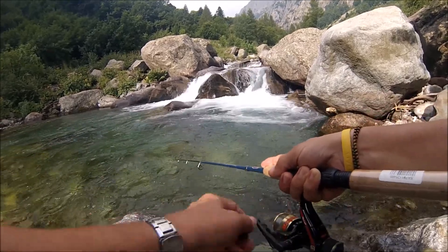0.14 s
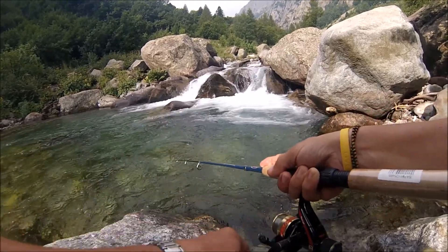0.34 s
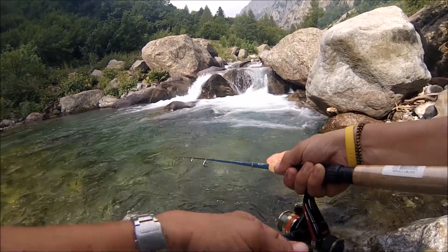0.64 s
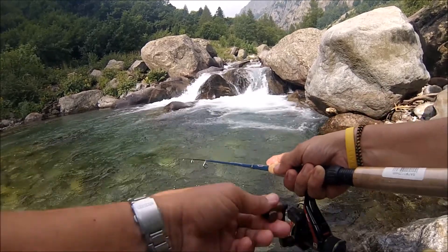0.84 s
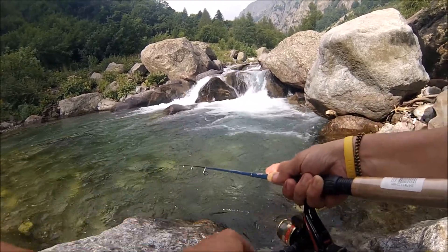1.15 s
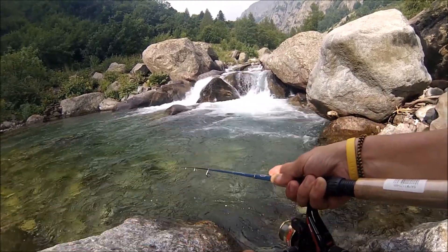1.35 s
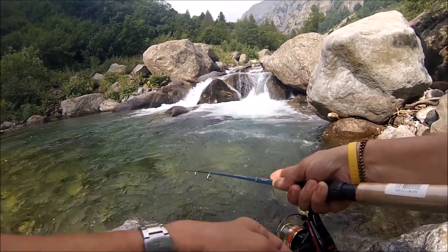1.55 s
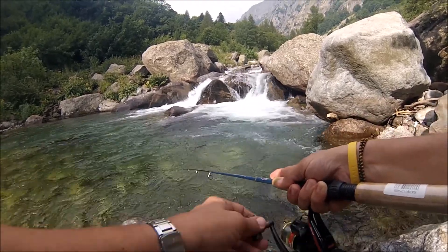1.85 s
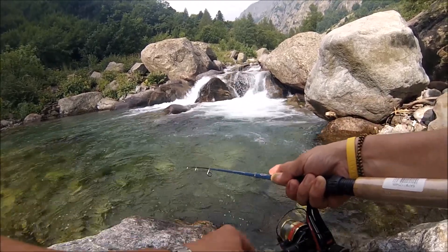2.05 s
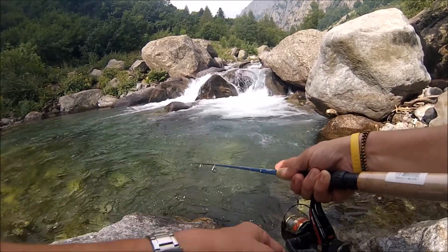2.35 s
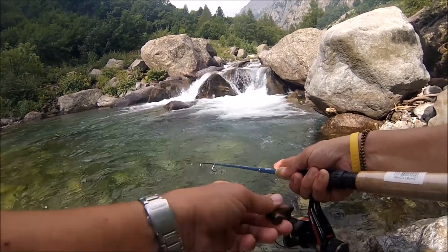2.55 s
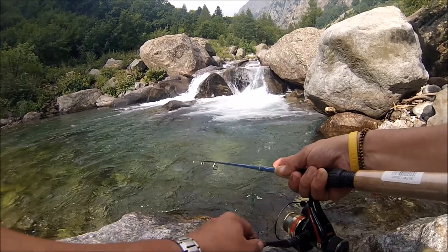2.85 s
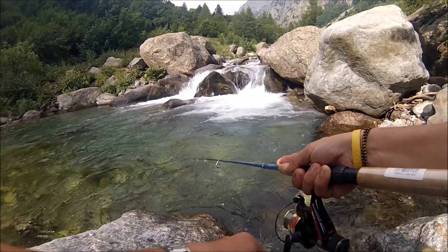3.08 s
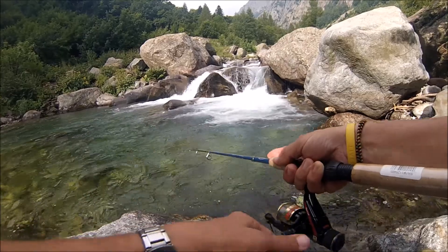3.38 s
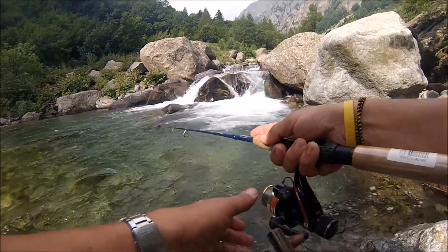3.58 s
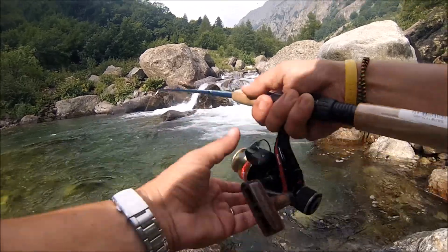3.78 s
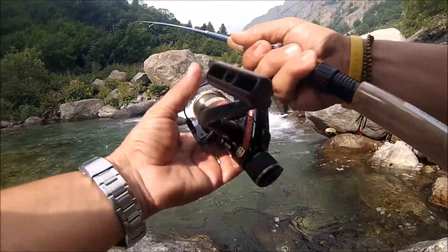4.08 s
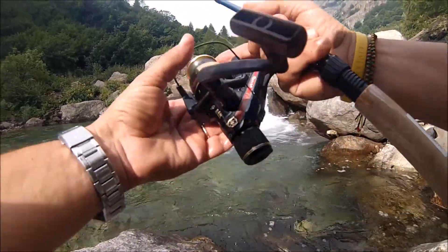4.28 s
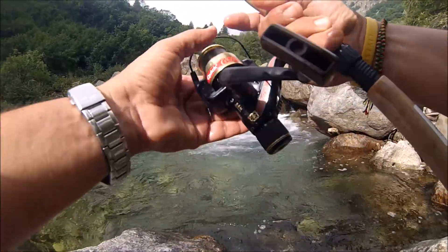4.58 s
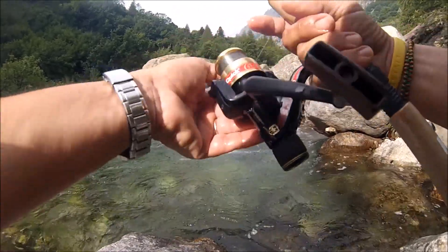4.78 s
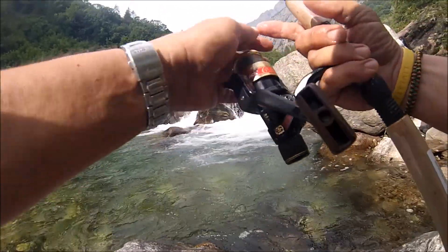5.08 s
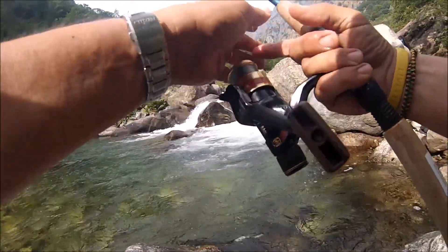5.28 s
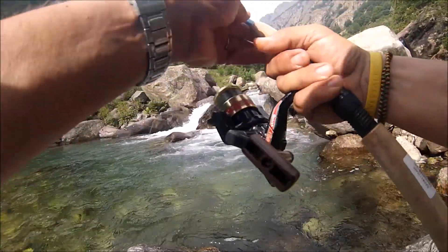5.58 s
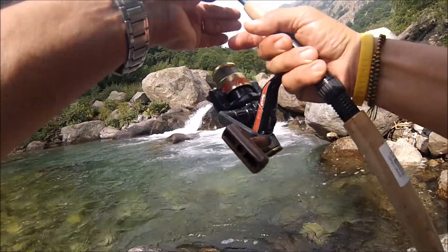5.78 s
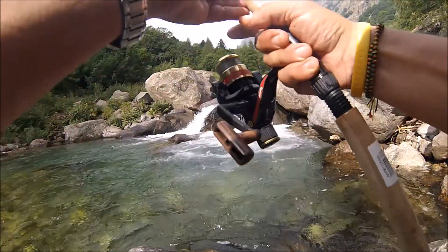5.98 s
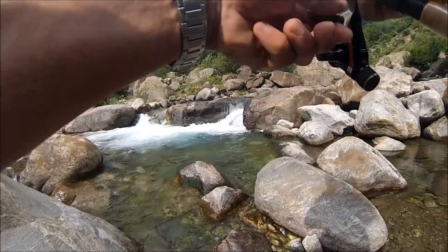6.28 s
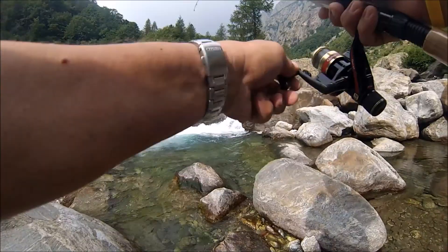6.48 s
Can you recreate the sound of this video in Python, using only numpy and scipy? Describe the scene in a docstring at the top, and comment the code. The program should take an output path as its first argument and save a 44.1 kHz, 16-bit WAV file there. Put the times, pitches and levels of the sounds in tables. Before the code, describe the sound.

A small waterfall rushes into a rocky mountain pool throughout, a dense, steady, lightly flickering noise with bubbling detail, coloured boxy and resonant by the closed case of a body-worn camera. From 0 to about 3.4 seconds a fishing reel is wound close by: fine, bright metallic ratchet ticks at roughly thirty to forty-five per second, almost a purr, speeding and easing with the hand and slowing towards the end. Two faint separate clicks follow near 3.8 and 3.9 seconds as the reel is handled. Then only water remains, its spray slightly duller. At about 6.3 seconds the angler turns aside; the rush abruptly changes tone, more hollow and less crisp, and a softer, fast ticking resumes until the end at about 6.6. Beneath everything, very low, soft paired heartbeat thumps recur about every half second, varying in strength. Nearly mono, without echo.

```python
"""A small waterfall rushes into a mountain pool: shaped noise with bubbles, its bands flickering apart,
heard by a body-worn camera in a closed, ringing case. An angler winds a reel whose pawl ticks over its
ratchet, each tick a burst of damped modes; he stops, then turns aside and winds again.
His pulse knocks softly through the camera mount as pairs of brief low swings."""
import sys
import numpy as np
from scipy import signal
from scipy.fft import rfft, irfft, next_fast_len
from scipy.io import wavfile
from scipy.ndimage import uniform_filter1d

SR = 44100
rng = np.random.default_rng(int(sys.argv[2]) if len(sys.argv) > 2 else 0)


def dump(signal):
    """Clip the signal to [-1, 1] and save it as 16-bit WAV at the path in sys.argv[1]."""
    limited = np.clip(np.atleast_2d(signal).T, -1, 1)
    pcm = np.round(limited * 32767).astype(np.int16)
    wavfile.write(sys.argv[1], SR, pcm)


N = 292369
TIME = np.arange(N) / SR  # s
SIZE = next_fast_len(N + 8192)  # transform length, padded so that filter tails do not wrap
FREQ = np.maximum(np.arange(SIZE // 2 + 1) * SR / SIZE, 1)  # Hz

# spectrum of the falling water: (frequency [Hz], relative density [dB])
RUSH_SPECTRUM = [(20, 4.5), (60, -1.5), (180, -4), (300, -1.5), (420, -4), (660, -14), (950, -14),
                 (1300, -7.5), (2400, -9.5), (2850, -20.5), (4400, -21.5), (7000, -22.5), (9500, -29.5),
                 (15000, -37)]
# air and wall resonances of the case, heard in the water:
# (frequency [Hz], full width at half the lift [Hz], lift [dB])
CASE_RESONANCES = [(1501, 220, 7), (1736, 224, -4), (1984, 125, 5.5), (2279, 235, 9), (3100, 88, 7),
                   (3477, 330, 7), (3870, 140, 6), (5400, 520, 2.5), (12300, 3600, 3)]
# change in the rush when the angler faces fully away: (frequency [Hz], change [dB])
ASIDE_CHANGE = [(100, 1.5), (270, -6), (500, -0.5), (800, 7.5), (1150, -1), (1500, -2), (2000, -8),
                (2500, -3.5), (3400, -3.5), (6000, -4), (14000, -2)]
# how far the angler has turned: (time [s], share turned aside [0-1])
TURN_SHARE = [(0, 0.1), (6.24, 0.05), (6.34, 0.9), (6.63, 0.76)]
RUSH_DB = -47.5  # steady fall, before flicker and turning
SPRAY_DB = 0.06  # lift of the bands above 3 kHz
# raised arms shade the spray from the microphone
ARMS_UP_S, ARMS_RISE_S, ARMS_SHADE_DB = 3.2, 0.71, -1.45

# faint hiss that differs between the sides: (frequency [Hz], relative density [dB])
SIDE_HISS_SPECTRUM = [(100, -9), (3000, -20), (4800, -11), (6000, -14.5), (8500, 8.5), (11000, 6.5),
                      (15000, -11.5)]
SIDE_HISS_DB = -83

# heartbeats: (time [s], relative strength [dB])
HEARTBEATS = [(-0.04, -6), (0.487, -4), (1.026, 0.5), (1.555, 3), (2.09, -1), (2.623, -4.5), (3.152, -4),
              (3.682, 2.5), (4.21, 4.5), (4.741, 1), (5.275, -2.5), (5.808, 4), (6.365, 3.5)]
# the quick first swing takes only a share of a beat's strength in dB
KNOCK_HZ, KNOCK_DB, KNOCK_SHARE = 35, -40, 0.6
# the slow second swing is brisker on strong beats
HEAVE_LAG_S, HEAVE_HZ, HEAVE_HZ_PER_DB, HEAVE_DB = 0.0794, 18.9, 0.5, -38.5

# pace of the hand with the rod low, before crank surges: (time [s], rate [ratchet teeth/s])
WINDING_LOW = [(0, 46.06), (0.39, 33.74), (0.56, 41.61), (1.17, 32.88), (1.39, 41.79), (1.67, 32.24),
               (2.44, 43.05), (2.99, 26.46), (3.4, 22.12)]
# pace of the hand with the rod raised: (time [s], rate [ratchet teeth/s])
WINDING_RAISED = [(6.27, 46.31), (6.4, 44.64), (6.5, 50.93), (6.63, 41.62)]
# modes of the reel, each the square of one resonance:
# (frequency [Hz], width before squaring [Hz], relative level held low [dB], held raised [dB])
REEL_MODES = [(3500, 440, -2.5, -8), (4420, 310, -2, -9), (5470, 300, 0.5, -3), (5810, 770, -2, -12),
              (6810, 370, 1, -4.5), (7900, 620, -10, -3), (8570, 400, -19, -14), (8750, 380, -7.5, -11),
              (10000, 340, -11, -13), (11020, 820, -10.5, -16), (12250, 800, -12.5, -14),
              (14500, 2000, -19, -19)]
# single clicks as the reel is taken in hand: (time [s], level [dB])
HANDLING_CLICKS = [(3.842, -62), (3.922, -61.5)]
# interval between crank strokes, moment of one stroke, peak rise in rate
STROKE_S, STROKE_AT_S, SURGE_TEETH_PER_S = 0.479, 0.359, 2.62
# tick level at the median rate, and its growth with speed
TICK_LOW_DB, TICK_RAISED_DB, TICK_DB_PER_DOUBLING = -60.1, -64, 2.5
TOOTH_SCATTER_DB = 2.3  # how much each tooth differs in the modes that it favours

TOP_HZ = 15250  # upper edge of the camera's passband


def undb(db):
    """Decibel law: amplitude gain is ten to the power of dB / 20."""
    return 10 ** (np.asarray(db) / 20)


def level(x, db):
    """Normalization: scale a signal to a given rms level in dB."""
    return x * undb(db) / np.sqrt(np.mean(x ** 2))


def shape(x, gain):
    """Linear filtering: multiply the spectrum by a gain for each frequency."""
    return irfft(rfft(x, SIZE) * gain, SIZE)[:N]


def colour(points, hz):
    """Spectral envelope: join (frequency [Hz], level [dB]) points along a log-frequency axis."""
    point_hz, point_db = np.transpose(points)
    return np.interp(np.log(hz), np.log(point_hz), point_db)


def resonance(hz, width_hz, freq=FREQ):
    """Damped oscillator: band-pass response of one mode, with gain 1 at its centre."""
    damping = 1j * freq * width_hz
    return damping / (hz ** 2 - freq ** 2 + damping)


def walk(rate):
    """Slow random fluctuation: levels held for 1 / rate s, then smoothed twice; spread near 1."""
    hold = int(SR / rate)
    held = np.repeat(rng.standard_normal(N // hold + 1), hold)
    smooth = uniform_filter1d(uniform_filter1d(held, hold), hold)
    return np.sqrt(2) * smooth[:N]


def bubbles(count, spread_db, cycles):
    """Bubble resonance: air pockets ring briefly and rise in pitch as they near the surface."""
    out = np.zeros(N + SR)
    for when, pitch, size in rng.random((count, 3)):
        hz = 200 * 16 ** pitch  # four octaves up from 200 Hz
        age = np.arange(int(min(cycles / hz, 0.5) * SR))  # samples
        fade = age / len(age)
        phase = 2 * np.pi * hz * age / SR * (1 + fade / 10)
        ring = np.sin(phase) * np.exp(-np.log(100) * fade)  # decays by 40 dB
        # many small pockets and a few strong ones
        strength_db = -spread_db * np.log(max(1 - size, 1 / count))
        start = int(when * N)
        out[start:start + len(age)] += undb(strength_db) * ring
    return out[:N]


def waterfall():
    """Superposition: countless bursts merge into noise with bubbles; each band flickers on its own."""
    turned = np.interp(TIME, *np.transpose(TURN_SHARE))
    arms_up = np.clip((TIME - ARMS_UP_S) / ARMS_RISE_S, 0, 1)
    spray_db = SPRAY_DB + ARMS_SHADE_DB * arms_up * (1 - turned)

    bursts = level(rng.standard_normal(N), 0)
    nearer = level(bubbles(count=2500, spread_db=2.0, cycles=18.5), -18.5)
    case_db = sum(db * 0.5 ** ((2 * (FREQ - hz) / width) ** 2) for hz, width, db in CASE_RESONANCES)
    rush = shape(bursts + nearer, undb(colour(RUSH_SPECTRUM, FREQ) + case_db))
    spectrum = rfft(level(rush, RUSH_DB), SIZE)

    out = np.zeros(N)
    for hz in 2 ** np.arange(4, 14.6, 0.5):
        # overlapping triangles, half an octave apart
        window = np.maximum(1 - 2 * np.abs(np.log2(FREQ / hz)), 0)
        band = irfft(spectrum * window, SIZE)[:N]
        lift_db = spray_db if hz > 3000 else 0
        flicker_db = 0.58 * walk(14)
        out += band * undb(lift_db + turned * colour(ASIDE_CHANGE, hz) + flicker_db)
    return out


def side_hiss():
    """Stereo difference: independent shaped noise, to be added to one side and taken from the other."""
    hiss = shape(rng.standard_normal(N), undb(colour(SIDE_HISS_SPECTRUM, FREQ)))
    return level(hiss, SIDE_HISS_DB)


def pulse(rise_cycles, fall_cycles, rub_db):
    """Impulsive excitation: each beat rocks the camera, a quick knock and a slow heave; the strap rubs."""
    out = np.zeros(N)
    # dull strap noise, level relative to the swing that carries it
    rub = level(shape(rng.standard_normal(N), resonance(64, 60) ** 2), rub_db)
    for beat, strength_db in HEARTBEATS:
        knock = beat, KNOCK_HZ, KNOCK_DB + KNOCK_SHARE * strength_db
        heave_hz = HEAVE_HZ + HEAVE_HZ_PER_DB * strength_db
        heave = beat + HEAVE_LAG_S, heave_hz, HEAVE_DB + strength_db
        for when, hz, db in (knock, heave):
            near = np.abs(TIME - when) < 2 / hz
            turns = (TIME[near] - when) * hz  # cycles from the middle of the swing
            width = np.where(turns < 0, rise_cycles, fall_cycles)
            envelope = np.exp(-(turns / width) ** 2)
            out[near] += undb(db) * envelope * (rub[near] - np.sin(2 * np.pi * turns))
    return out


def teeth(pace, surge, tick_db):
    """Ratchet kinematics: the pawl drops at each whole tooth of travel; faster teeth tick louder.

    Gives rows (time [s], level [dB]); the crank surges by a cosine on each push and pull."""
    rate = np.interp(TIME, *np.transpose(pace), left=0, right=0)
    stroke = np.cos(2 * np.pi * (TIME - STROKE_AT_S) / STROKE_S)
    rate = rate + (rate > 0) * surge * stroke
    teeth_passed = np.floor(np.cumsum(rate) / SR)
    drops = np.flatnonzero(np.diff(teeth_passed))
    doublings = np.log2(rate[drops] / np.median(rate[drops]))
    return np.column_stack([TIME[drops], tick_db + TICK_DB_PER_DOUBLING * doublings])


def pawl(ticks, modes, rise_s, fall_s):
    """Modal excitation: the pawl scrapes a tooth's edge, snaps down and chatters, ringing the reel."""
    out = np.zeros(N + SR)
    age = np.arange(-256, 512) / SR  # s from the snap
    force = np.exp(-np.where(age < 0, (age / rise_s) ** 2, age / fall_s))
    freq = np.fft.rfftfreq(len(age), 1 / SR)
    rings = np.array([undb(db) * resonance(hz, width, freq) ** 2 for hz, width, db in modes])
    for when, db in ticks:
        scrape = rfft(force * rng.standard_normal(len(age)))
        # each tooth favours the modes a little differently
        ring = undb(TOOTH_SCATTER_DB * rng.standard_normal(len(modes))) @ rings
        # the scrape gives only phase, so the modes alone set the magnitudes
        tick = irfft(ring * scrape / np.abs(scrape))
        start = max(int((when + age[0]) * SR), 0)
        # one spring: scatter among the modes leaves the snap's energy alone
        out[start:start + len(age)] += level(tick, db)
    return out[:N]


def reel():
    """Directional radiation: when raised, the reel shows the microphone another side, with other mode levels."""
    hz, width, low_db, raised_db = np.transpose(REEL_MODES)
    low = np.column_stack([hz, width, low_db])
    raised = np.column_stack([hz, width, raised_db])
    low_ticks = teeth(WINDING_LOW, SURGE_TEETH_PER_S, TICK_LOW_DB)
    raised_ticks = teeth(WINDING_RAISED, 0, TICK_RAISED_DB)
    first = pawl(low_ticks, low, rise_s=0.0014, fall_s=0.0013)
    handled = pawl(HANDLING_CLICKS, low, rise_s=0.00098, fall_s=0.0009)
    second = pawl(raised_ticks, raised, rise_s=0.0014, fall_s=0.0016)
    return first + handled + second


def scene():
    """Sum and difference: the case makes every source mono; only a faint hiss differs between sides."""
    water = waterfall()
    side = side_hiss()
    heart = pulse(rise_cycles=0.72, fall_cycles=0.83, rub_db=-17.5)
    mid = water + heart + reel()
    return np.array([mid + side, mid - side])


def record(dry):
    """Band limiting: the camera cuts the top with a steep elliptic low-pass."""
    lowpass = signal.ellip(12, 0.1, 70, TOP_HZ, fs=SR, output="sos")  # ripple 0.1 dB, stopband 70 dB
    return signal.sosfilt(lowpass, dry)


dry = scene()
out = record(dry)
dump(out)
```